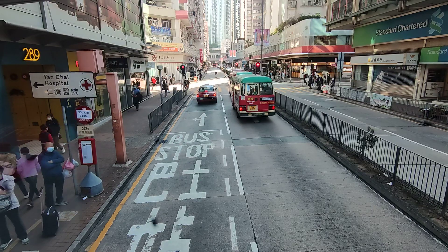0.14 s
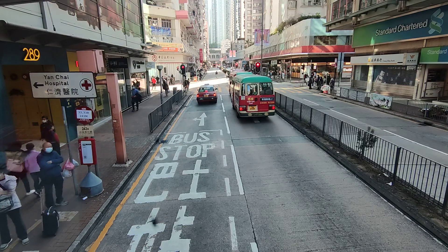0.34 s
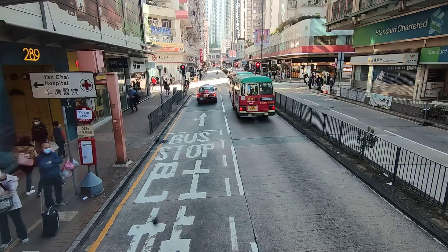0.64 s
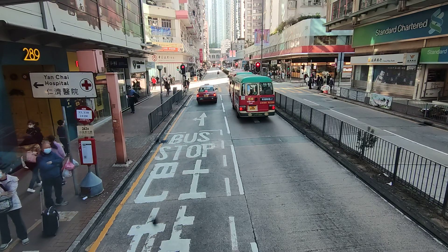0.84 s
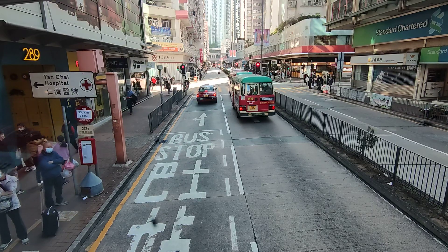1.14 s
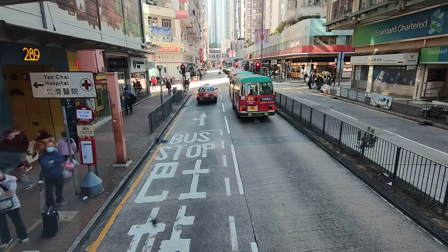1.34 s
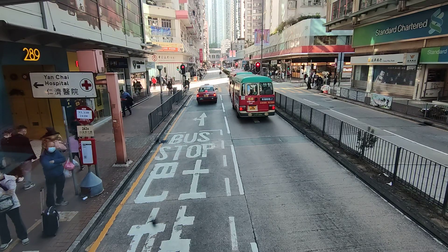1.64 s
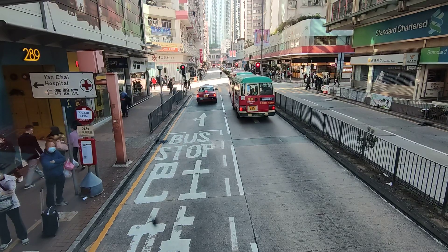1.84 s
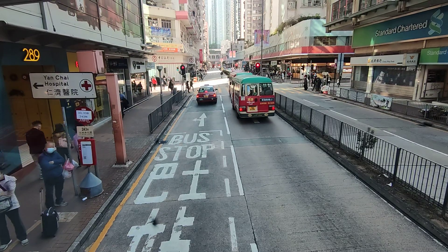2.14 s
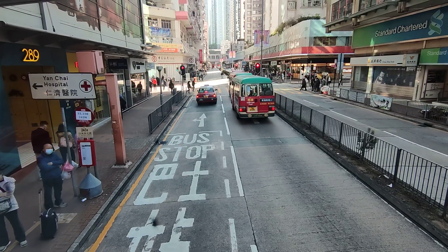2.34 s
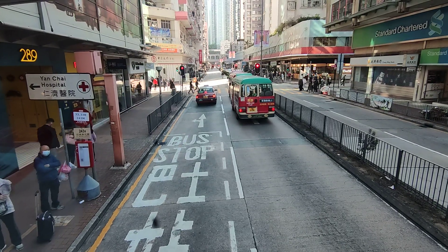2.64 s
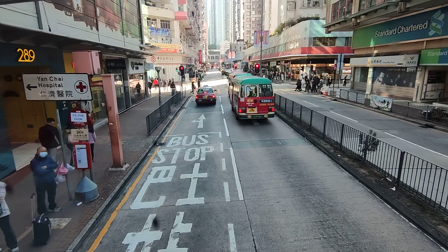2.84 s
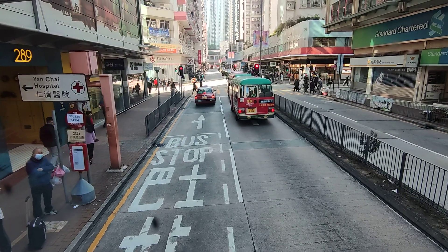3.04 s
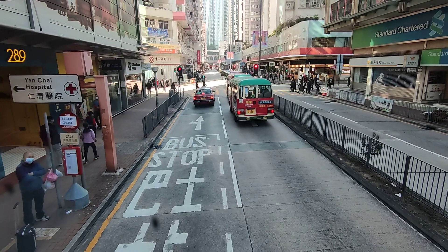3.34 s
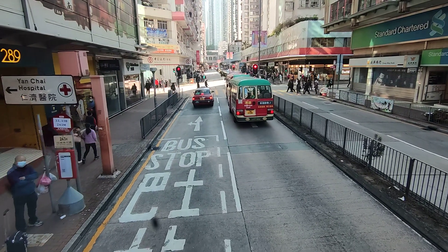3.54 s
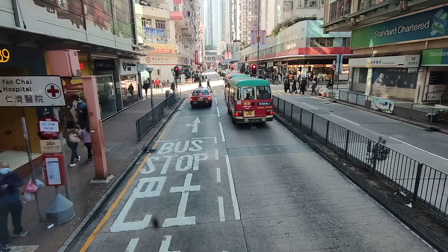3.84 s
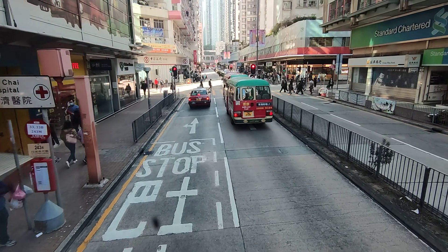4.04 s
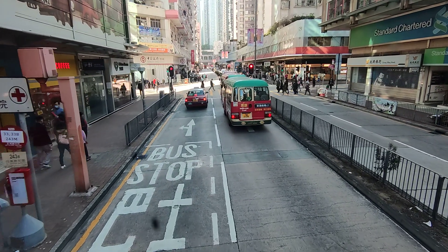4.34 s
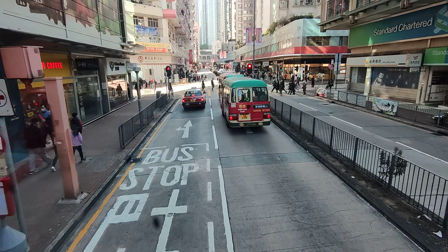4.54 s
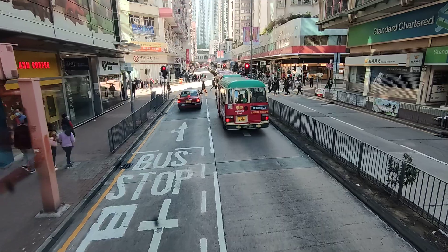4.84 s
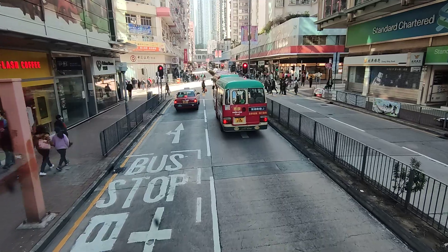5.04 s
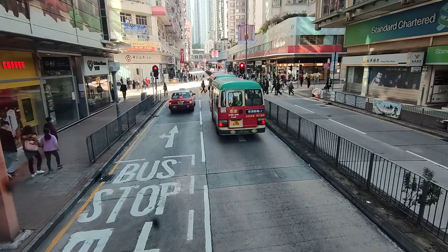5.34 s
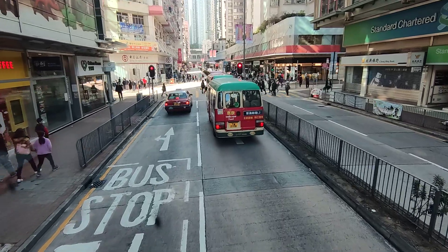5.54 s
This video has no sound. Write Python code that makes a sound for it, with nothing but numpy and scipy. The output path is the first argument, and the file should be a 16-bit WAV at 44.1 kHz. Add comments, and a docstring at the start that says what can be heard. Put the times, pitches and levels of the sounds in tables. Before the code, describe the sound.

Heard close from inside a bus's upper deck: a deep diesel drone idles, jumps up in a brief rev around two seconds, drops back, then climbs and swells as the bus rolls off before easing down. Loose trim buzzes and chatters, footfalls and bumps knock hollow panels, clothes and bags scuff, and crackly air vents hiss steadily.

```python
"""A diesel engine idles under the upper deck of a bus, revs briefly, then swells as the bus pulls away.
The drone is a set of sine waves tied to the engine's firing rate, boosted or dropped by the saloon.
Filtered noise makes the rumble and sway; loose trim buzzes, chatters with the firing and faintly squeaks.
Footfalls and bumps knock on the deck as noise bursts with a ringing panel. Clothes and bags rustle
as shaped noise over the steady, crackly hiss of the air vents."""
import sys
import numpy as np
from scipy import signal
from scipy.fft import rfft, irfft, next_fast_len
from scipy.io import wavfile

SR = 44100
rng = np.random.default_rng(int(sys.argv[2]) if len(sys.argv) > 2 else 0)


def to_wav(s):
    """Save 16-bit WAV."""
    ch = np.atleast_2d(s).T  # columns
    pcm = np.round(np.clip(ch, -1, 1) * 32767)  # PCM
    wavfile.write(sys.argv[1], SR, pcm.astype(np.int16))


N = 251370
TIME = np.arange(N) / SR

# How fast the engine fires. Each row: time in seconds, firing rate in Hz.
SPEED = [(0.0, 35.02), (1.68, 35.52), (2.2, 43.75), (2.38, 42.95), (2.51, 36.01), (3.09, 37.51),
         (3.68, 48.04), (3.87, 50.3), (4.16, 51), (4.43, 50.57), (4.79, 46.62), (5.1, 42.71), (5.49, 36.22),
         (5.62, 36.24), (5.7, 37.64)]


def amp(db):
    """Turns decibels into a gain."""
    return 10 ** (np.asarray(db) / 20)


def unit(x):
    """Scales a sound to an average (rms) level of 1."""
    return x / np.sqrt(np.mean(x ** 2) + 1e-20)


def curve(rows):
    """Joins (time, value) rows with straight lines, giving one value a sample."""
    seconds, values = np.transpose(rows)
    return np.interp(TIME, seconds, values)


def read(points, hz):
    """Reads a (frequency, value) table at any frequency, on a log-frequency axis."""
    f, value = np.transpose(points)
    return np.interp(np.log(hz + 1), np.log(f + 1), value)


def colour(x, spectrum):
    """Filters with a (Hz, dB) spectrum, never ahead of time, so attacks stay sharp; steep fall above it."""
    size = next_fast_len(x.shape[-1] + 4096)
    hz = abs(np.fft.fftfreq(size, 1 / SR))
    top_hz = spectrum[-1][0]
    gain = amp(read(spectrum, hz)) / np.maximum(hz / top_hz, 1) ** 3 + 1e-6
    # the phase that goes with this gain and puts the energy as early as possible
    response = np.exp(np.conj(signal.hilbert(np.log(gain))))
    filtered = np.fft.ifft(np.fft.fft(x, size) * response).real
    return filtered[..., :x.shape[-1]]


def drift(hz):
    """Makes a slow random wander of rms 1, with changes up to about hz."""
    f = np.fft.rfftfreq(N, 1 / SR)
    return unit(irfft(rfft(rng.standard_normal(N)) / (1 + (f / hz) ** 4), N))


def add(mix, s, sound):
    """Mixes a sound in at s seconds, cut off at the end of the mix."""
    part = mix[:, max(round(s * SR), 0):][:, :sound.shape[-1]]
    part += sound[..., :part.shape[-1]]


def saloon(x, t60, wet_db):
    """Adds a dying noise tail for the reflections, different on each side; t60 is the time to fall 60 dB."""
    t = np.arange(SR // 3) / SR
    tail = rng.standard_normal((2, len(t))) * amp(-60 * t / t60)
    tail *= amp(wet_db) / np.linalg.norm(tail[0])
    tail[:, 0] += 1  # the direct sound
    return signal.fftconvolve(np.atleast_2d(x), tail, axes=1)[:, :x.shape[-1]]


def burst(spectrum, rise, hold, t60, grain_db):
    """Many small contacts as grainy noise that builds, holds at about rms 1 and dies away; times in seconds."""
    t = np.arange(SR) / SR
    grains = np.repeat(rng.standard_normal(len(t) // 63), 63)  # a new strength every 63 samples
    decay = amp(-60 * np.maximum(t - hold, 0) / max(t60, .03))
    shape = (1 - np.exp(-t / rise)) * decay
    noise = rng.standard_normal((2, len(t))) * shape * amp(grain_db * grains)
    x = colour(noise, spectrum)
    return x * np.linalg.norm(shape) / np.linalg.norm(x, axis=1, keepdims=True)


def engine():
    """Multiples (orders) of the firing rate, which swell and drop as they cross the saloon's resonances."""
    # Boom at the firing rate. Each row: time in seconds, level in dB before the final trim.
    boom_curve = [(0.0, -11), (0.06, -17), (1.49, -19), (2.3, -11), (2.48, -25), (2.54, -13.5),
                  (2.68, -10.5), (2.89, -19), (2.97, -13), (3.59, -11.5), (3.71, -22.5), (3.79, -17),
                  (4.64, -15), (4.84, -25), (5.13, -17.5), (5.49, -26.5), (5.62, -16.5), (5.7, -15)]
    # Saloon resonances, for orders two and four. Each row: frequency in Hz, level in dB before the trims.
    cabin = [(70, -32), (73, -28), (81, -47), (95, -33), (102, -43), (140, -29), (147, -37), (175, -36.5),
             (185, -34.5), (193, -27), (204, -32.5)]
    # Weaker orders. Each row: multiple of the firing rate, level in dB against the untrimmed fourth order.
    weak_orders = [(4 / 3, -9.5), (1.5, -2), (3, -11), (5.5, -23.5), (6.5, -20)]
    # Panel resonance met by the eighth order: centre in Hz, width in Hz, level in dB before the final trim.
    panel_boom = (424, 170, -47.5)

    firing_hz, boom_db = curve(SPEED), curve(boom_curve)
    turns = np.cumsum(firing_hz) / SR  # firing cycles so far
    second_db, fourth_db = read(cabin, 2 * firing_hz), read(cabin, 4 * firing_hz)

    def line(multiple, db, rough):
        """One order as a sine wave that wavers in strength and phase."""
        phase = 2 * np.pi * (multiple * turns + rng.random())
        steady = (1 + rough * drift(4.2)) * np.sin(phase)
        return np.sqrt(2) * amp(db) * (steady + rough * drift(14) * np.cos(phase))

    centre_hz, width_hz, panel_db = panel_boom
    off_centre = 2 * (8 * firing_hz - centre_hz) / width_hz
    eighth_db = panel_db - 10 * np.log10(1 + off_centre ** 2)
    clean = line(1, boom_db, .02) + line(4, fourth_db, .05) + line(8, eighth_db, .15)
    weak = sum(line(multiple, fourth_db + db, 0.047) for multiple, db in weak_orders)
    return amp(-0.57) * clean + line(2, second_db - 0.6, 0.35) + weak


def body():
    """The shell rumbles, sways and jolts; loose trim buzzes and taps in step with the firing."""
    # Colours of the noise for rumble, sway and buzzing trim. Each row: frequency in Hz, level in dB per Hz.
    rumble_colour, sway_colour, trim_colour = [(25, -10.5), (50, -10.5), (70, -5.5), (110, -3), (160, -9),
                                               (230, -15), (320, -25.5), (600, -59)], [(5, -8), (14, 11), (26, 4), (45, 3.5),
                                                               (62, -7), (90, -34)], [(100, -46), (280, -8),
                                                                             (420, 2.5), (560, -6.5),
                                                                             (700, -1), (850, -5),
                                                                             (1100, -10), (1500, -10.5),
                                                                             (1800, -15.5), (2200, -36),
                                                                             (3000, -32)]
    # Jolts of the body. Each row: time in seconds, peak level of the sway in dB.
    jolt_rows = [(1.7, -28), (2.23, -20.5), (3.0, -19.5), (3.408, -23.5), (4.56, -18.5), (5.101, -22.5),
                 (5.62, -20.5)]
    # Tones of loose trim. Each row: frequency in Hz, relative level in dB, time to fall 60 dB in seconds.
    trim_modes = [(362, 1.5, 0.041), (403, 3.5, 0.065), (466.5, -2, 0.092), (554, -0.5, 0.069),
                  (675, -9, 0.063), (695.4, -6.5, 0.11), (786, -1.5, 0.089), (862.5, -12, 0.15),
                  (1347, -15, 0.094), (1498, -34.5, 0.07), (1650, -20.5, 0.089)]
    pull_away_s, gather_s = 2.1, 5.35  # the bus starts to roll, and would need this long to get going
    # levels in dB: at idle, and once fully rolling
    sway_idle_db, sway_rolling_db = -30, -23
    buzz_idle_db, buzz_rolling_db = -45, -46
    chatter_idle_db, chatter_rolling_db = -39.5, -50.5  # trim chatters most while the bus stands
    rumble_db, jolt_rumble_db = -33.5, -15  # middle level; a jolt's rumble against its sway
    jolt_width_s = 0.087

    rolling = np.clip((TIME - pull_away_s) / gather_s, 0, 1)
    buzz_db = buzz_idle_db + (buzz_rolling_db - buzz_idle_db) * rolling
    chatter_db = chatter_idle_db + (chatter_rolling_db - chatter_idle_db) * rolling
    sway_db = sway_idle_db + (sway_rolling_db - sway_idle_db) * rolling
    jolts = sum(amp(db) * np.exp(-((TIME - s) / jolt_width_s) ** 2) for s, db in jolt_rows)

    turns = np.cumsum(curve(SPEED)) / SR
    shove = (1 + np.cos(2 * np.pi * turns)) ** 2  # one push each firing cycle

    sway = unit(colour(rng.standard_normal(N), sway_colour)) * np.hypot(amp(sway_db), jolts)
    rumble_gain = np.hypot(amp(rumble_db + 3.5 * drift(1.5)), amp(jolt_rumble_db) * jolts)
    rumble = unit(colour(rng.standard_normal((2, N)), rumble_colour)) * rumble_gain
    buzz_gain = amp(0.55 * drift(23) + 0.49 * shove)
    buzz = unit(colour(rng.standard_normal((2, N)) * buzz_gain, trim_colour))

    tap_strength = amp(3.1 * np.minimum(rng.exponential(1, N), 2.5))
    taps = (rng.random(N) < 50 / SR * shove) * tap_strength  # 50 a second, times the push
    t = np.arange(SR // 4) / SR
    chatter = 0
    for hz, db, t60 in trim_modes:
        # every tap lands on another spot, and so shares its energy differently among the modes
        hits = taps * rng.uniform(-0.95, 1, N)
        ring = amp(db - 60 * t / t60) * np.sin(2 * np.pi * hz * t)
        chatter = chatter + signal.oaconvolve(hits, ring)[:N]
    chatter = unit(saloon(chatter, t60=0.12, wet_db=5.0))
    return sway + rumble + buzz * amp(buzz_db) + chatter * amp(chatter_db)


def rustle():
    """Steady vent hiss is noise with fine crackle; cloth and bags scuff over it with uneven pressure."""
    # Scuffs. Each row: start in seconds, relative level in dB, top fizz in dB added to that,
    # length of the hold in seconds.
    scuff_rows = [(0.0, -40, -12, 0.053), (0.132, -36.5, -30, .006), (0.354, -36, -29, 0.021),
                  (1.031, -44, -15, 0.7), (1.469, -37, -20, 0.0091), (1.793, -35, -19, 0.037),
                  (2.004, -42, -30, 0.022), (2.102, -48, -10, 0.45), (2.437, -42, -19, 0.011),
                  (2.547, -40.5, -8, 0.04), (2.744, -37.5, -13.5, 0.28), (3.089, -31.5, -35, 0.004),
                  (3.29, -38, -24, 0.0077), (3.371, -34, -11, 0.0066), (3.799, -42.5, -9, .09),
                  (3.925, -38.5, -33, 0.0039), (4.151, -46.5, -12, 0.29), (4.507, -31, -28, 0.0055),
                  (4.703, -40, -29, 0.017), (4.949, -44, -6.5, 0.11), (5.408, -41.5, -6, 0.076),
                  (5.536, -39, -8, 0.08)]
    # Colours of the vent air, the scuffs and their top fizz. Each row: frequency in Hz, level in dB per Hz.
    air_colour, scuff_colour, fizz_colour = [(1200, -12), (2000, -8.5), (2450, -8.5), (2900, -3.5),
                                             (3600, -2), (4300, -5.5), (5000, -1.5), (6300, 0.5), (7300, 2),
                                             (8200, -7), (9500, -13.5), (12000, -12.5), (16000, -20)], [(500, -59), (1200, 1), (2400, -8), (3300, -3),
                                                          (4400, -5.5), (5500, -0.5), (7300, 2),
                                                          (8300, -8.5), (10000, -19.5), (16000, -19)], [(3000, -59), (6000, -7),
                                                                         (9000, 4.5), (12000, -1),
                                                                         (16000, -7.5)]
    vent_db, rub_waver_db = -51.5, 1
    scuff_rise_s, scuff_t60_s = 0.001, 0.44
    swell_share = 0.04  # a rub's rise lengthens by this share of its length

    tick_gain = amp(5.4 * np.minimum(rng.exponential(1, N), 4))
    crackle = (rng.random(N) < 450 / SR) * tick_gain * rng.choice([-1, 1], N)  # about 450 ticks a second
    hiss = rng.standard_normal((2, N)) * amp(1.0 * drift(25))
    grain = hiss + amp(-5) * unit(saloon(crackle, t60=0.24, wet_db=13))

    cloth = np.zeros((2, N))
    for s, db, fizz_db, length in scuff_rows:
        timing = dict(rise=scuff_rise_s + swell_share * length, hold=length, t60=scuff_t60_s)
        add(cloth, s, amp(db - 6.5) * burst(scuff_colour, **timing, grain_db=2.0))
        add(cloth, s, amp(db + fizz_db - 9) * burst(fizz_colour, **timing, grain_db=2.0))
    return unit(colour(grain, air_colour)) * amp(vent_db) + cloth * amp(rub_waver_db * drift(31))


def knocks():
    """Each blow thuds through the floor by its weight and rings one panel, while the fittings clatter."""
    # Footfalls and bumps. Each row: start in seconds, relative level in dB, weight in dB,
    # ring pitch in Hz, ring in dB against the level.
    blows = [(0.164, -37.5, 8.5, 411, 3), (0.335, -30, 9.5, 383.4, 10.5), (0.373, -30.5, 0, 385.3, 11),
             (0.434, -34, 2, 408, -24), (0.588, -29, -2, 361.5, -1.5), (0.735, -40.5, 1, 612, 3.5),
             (0.926, -43, -4, 438, 9), (1.015, -38, -3, 465, 2.5), (1.1, -38.5, -8, 441, 3),
             (1.306, -26.5, 0.5, 389, 0.5), (1.465, -22.5, 2.5, 341, -2.5), (1.622, -38.5, 6, 419, -4),
             (1.683, -26.5, 7.5, 375, -9), (1.992, -25.5, 0.5, 395.4, -2), (2.252, -41, 15.5, 356, 14),
             (2.437, -37, 6, 304, -12), (2.779, -36.5, 6, 307, -3.5), (2.849, -30.5, 6, 621, -6),
             (3.255, -35.5, 8, 503, -3.5), (3.702, -29.5, 8.5, 330, -13), (4.135, -36, 9.5, 557, -5.5),
             (4.497, -38, 4, 443, 2), (4.533, -26.5, 7.5, 440, -17), (4.681, -40, 0, 493, 3.5),
             (4.786, -38.5, 10, 342.7, 4), (5.404, -36.5, 3, 398.3, -4), (5.612, -35, 5.5, 358.4, 0.5),
             (5.674, -39.5, 1, 412, 3)]
    # Upper tones of a struck panel. Each row: multiple of the ring pitch, level in dB against the blow's.
    ring_modes = [(1.68, -15.5), (1.9, -8), (2.301, -11), (3.699, -18)]
    # Colours of the floor, the panel and the fittings. Each row: frequency in Hz, level in dB per Hz.
    thud_colour, panel_colour, clatter_colour = [(40, -37), (90, 6), (130, 1.5), (220, -3), (300, -17),
                                                 (500, -45)], [(150, -25.5), (240, 2.5), (380, 1),
                                                               (550, -1), (680, -4), (850, -2),
                                                               (1100, -15.5), (1600, -18.5)], [(300, -49), (700, -12),
                                                                              (1050, -2), (1500, 3.5),
                                                                              (1850, -8), (2200, -14.5),
                                                                              (3000, -9), (3800, -14),
                                                                              (6000, -23.5), (9000, -37)]
    rise, t60 = 0.0014, 0.17  # seconds; each layer scales these
    ring_rise_s, ring_t60_s = 0.0011, .2
    base_clatter_db, clatter_per_weight = -15, 0.79  # heavier blows shake the fittings more

    out, t = np.zeros((2, N)), np.arange(SR // 2) / SR
    for s, db, weight_db, hz, ring_db in blows:
        modes = amp(ring_db) * np.sin(2 * np.pi * hz * t)
        for ratio, mode_db in ring_modes:
            modes = modes + amp(mode_db) * np.sin(2 * np.pi * ratio * hz * t)
        ring = modes * (1 - np.exp(-t / ring_rise_s)) * amp(-60 * t / ring_t60_s)
        thud = burst(thud_colour, rise=2 * rise, hold=0.014, t60=t60, grain_db=3.5)
        panel = burst(panel_colour, rise=0.23 * rise, hold=0.015, t60=t60, grain_db=5.5)
        clatter = burst(clatter_colour, rise=rise, hold=0.022, t60=1.02 * t60, grain_db=2.0)
        clatter_db = db + base_clatter_db + clatter_per_weight * weight_db
        add(out, s, amp(db + weight_db + 1.0) * thud)
        add(out, s, amp(db + 0.04) * panel)
        add(out, s, amp(db + 1.5) * ring)
        add(out, s, amp(clatter_db) * clatter)
    return out


def squeaks():
    """Rubbing plastic trim sticks and slips: a faint gliding sine wave with a broken pitch."""
    # Squeaks. Each row: start in seconds, end in seconds, start pitch in Hz, end pitch in Hz,
    # relative level in dB.
    squeak_rows = [(0.634, 0.923, 1570, 1540, -59), (1.781, 1.936, 3710, 3610, -51),
                   (3.102, 3.28, 2420, 2580, -55.5)]
    jitter, jitter_hz = .07, 291  # how far (share of the pitch) and how fast the pitch jumps

    out = np.zeros((2, N))
    for start, end, start_hz, end_hz, db in squeak_rows:
        glide_hz = np.interp(TIME, [start, end], [start_hz, end_hz])
        hz = glide_hz * (1 + jitter * drift(jitter_hz))
        swell = np.sqrt(np.interp(TIME, [start, (start + end) / 2, end], [0, 1, 0]))
        swell = swell * amp(3 * drift(35))
        tone = swell * np.sin(2 * np.pi * np.cumsum(hz) / SR)
        out += amp(db) * saloon(tone, t60=0.04, wet_db=-3)
    return out


def ports(x):
    """Two close microphone ports hear the bass alike and the treble apart, so treble is mixed less alike."""
    # Likeness of the two sides. Each row: frequency in Hz, likeness (1 is the same, values beyond are cut).
    likeness = [(60, 0.9), (140, 1.07), (210, 0.9), (330, 0.77), (500, 0.95), (770, 0.12), (1170, -0.85),
                (1790, 0.27), (2740, 0.11), (4190, -0.02), (6410, -0.04), (9810, 0.07), (15000, 0)]
    # Balance of the two sides. Each row: frequency in Hz, left minus right in dB.
    balance = [(60, 2), (92, -0.5), (140, -1), (210, 0), (330, -1), (500, -0.5), (770, -4.5), (1170, -4),
               (1790, -1), (2740, 0), (4190, -7), (6410, -3), (9810, 4), (15000, -6)]
    hz = np.fft.rfftfreq(N, 1 / SR)
    a, b = rfft(x * signal.windows.tukey(N, .003))
    same = np.clip(read(likeness, hz), -1, 1)
    lean = amp(read(balance, hz) / 2)
    left = a * lean
    right = (same * a + np.sqrt(1 - same ** 2) * b) / lean
    return irfft(np.array([left, right]), N)


def scene():
    """Lays the engine drone, equal on both sides, under everything that shakes and moves in the saloon."""
    return engine() + ports(body() + knocks() + squeaks() + rustle())


def record(dry):
    """The recorder's band limit removes the highest treble, after the two ends are faded softly."""
    edge_hz = 15800
    dry = dry * signal.windows.tukey(N, .002)
    low_pass = signal.firwin(511, edge_hz, window=("kaiser", 9), fs=SR)
    return signal.oaconvolve(dry, low_pass[None], "same")


dry = scene()
out = record(dry)
to_wav(out)
```